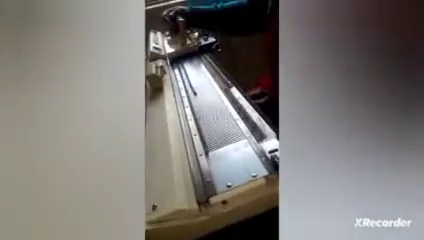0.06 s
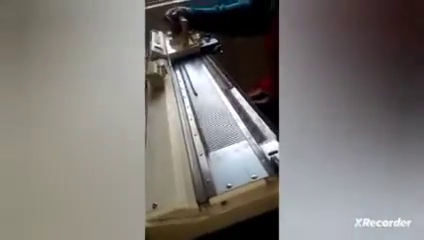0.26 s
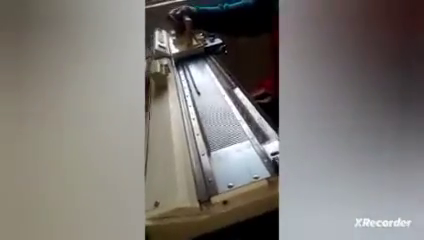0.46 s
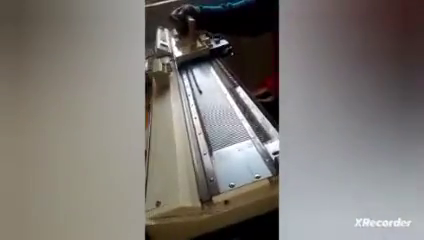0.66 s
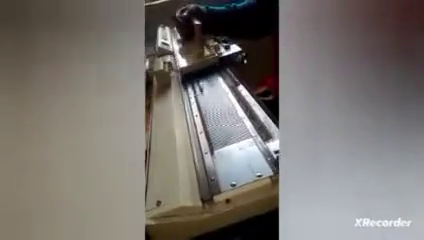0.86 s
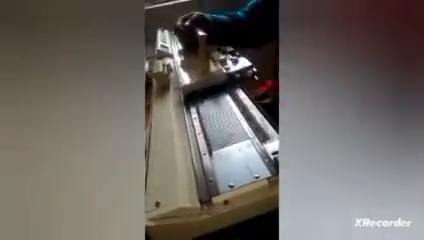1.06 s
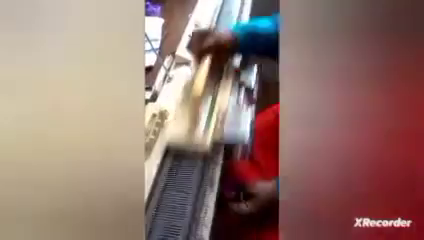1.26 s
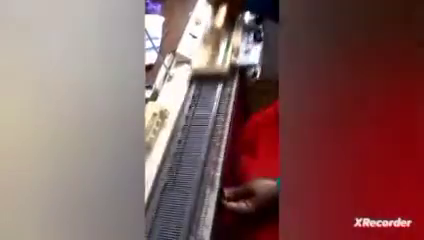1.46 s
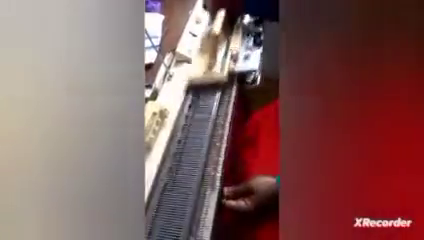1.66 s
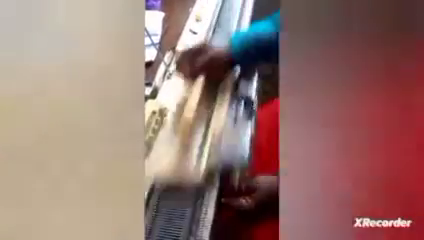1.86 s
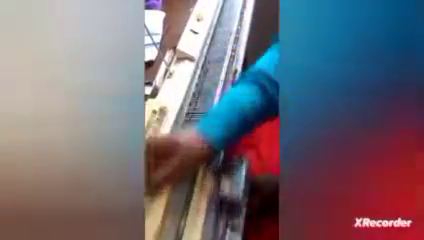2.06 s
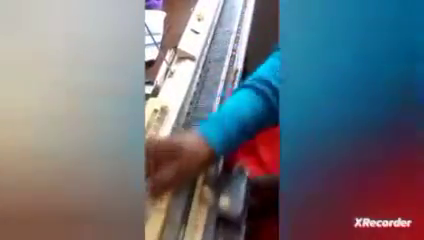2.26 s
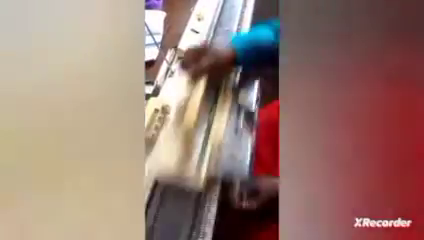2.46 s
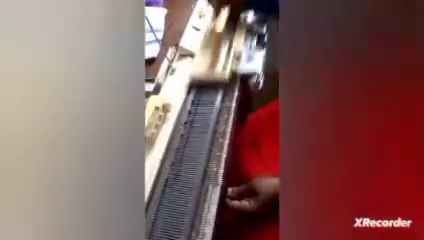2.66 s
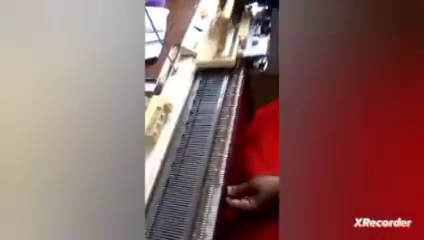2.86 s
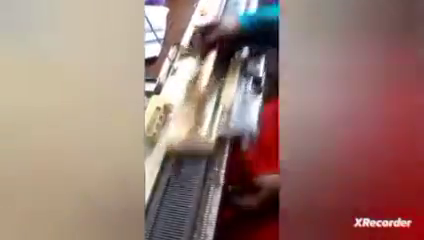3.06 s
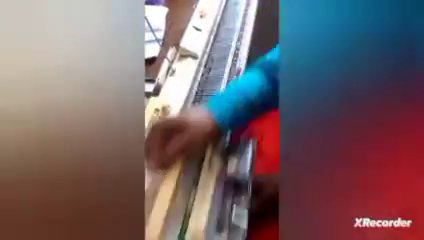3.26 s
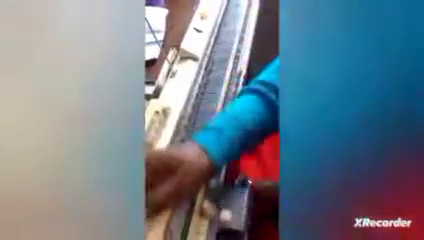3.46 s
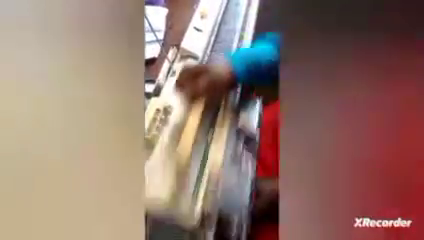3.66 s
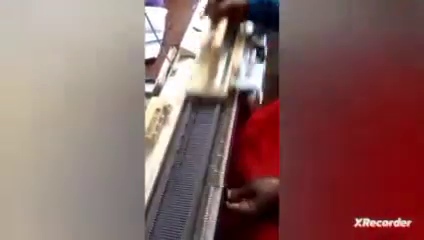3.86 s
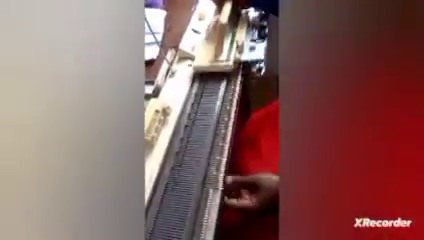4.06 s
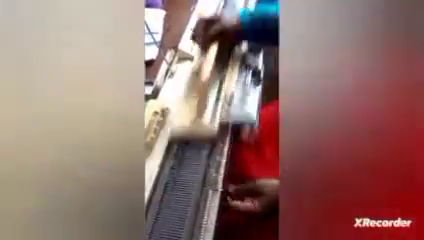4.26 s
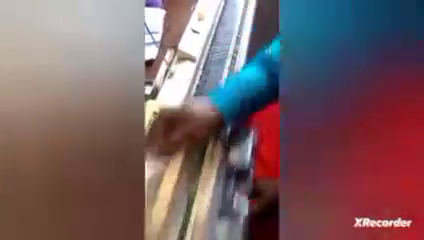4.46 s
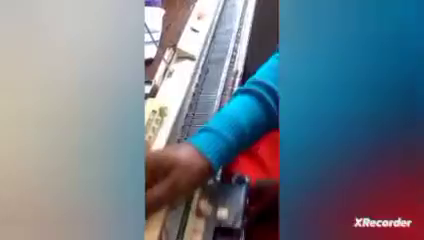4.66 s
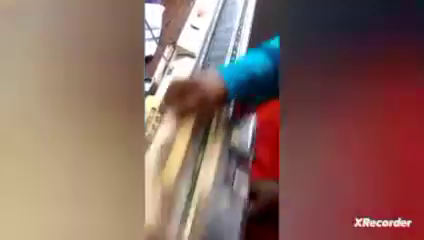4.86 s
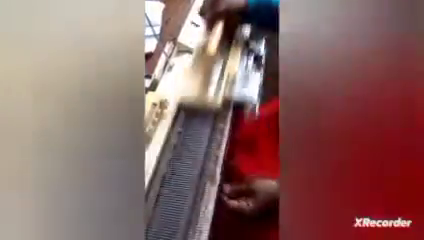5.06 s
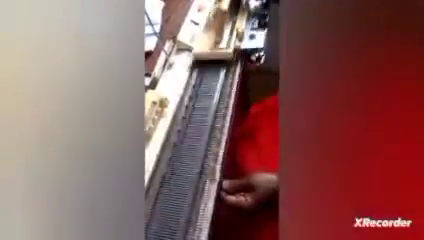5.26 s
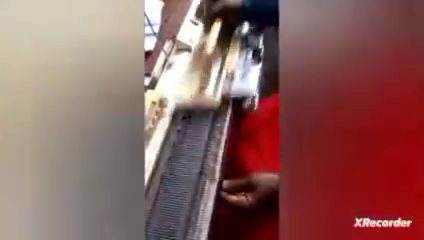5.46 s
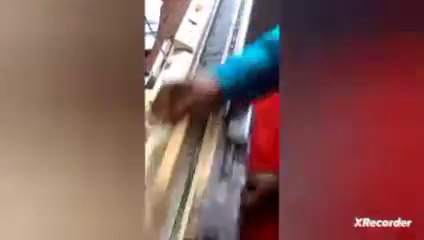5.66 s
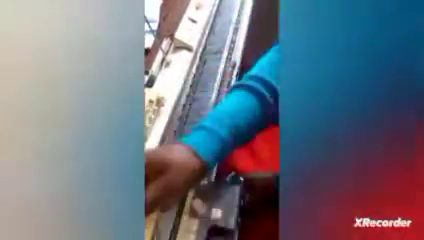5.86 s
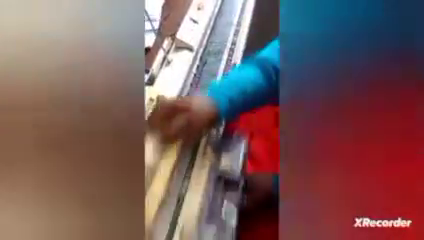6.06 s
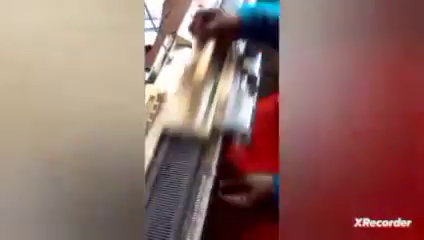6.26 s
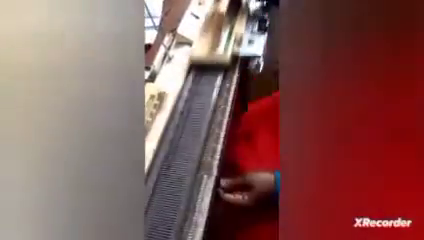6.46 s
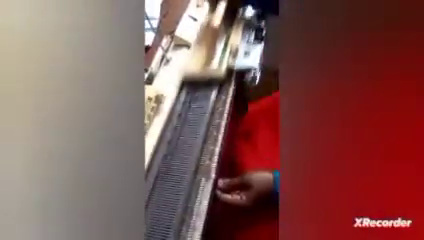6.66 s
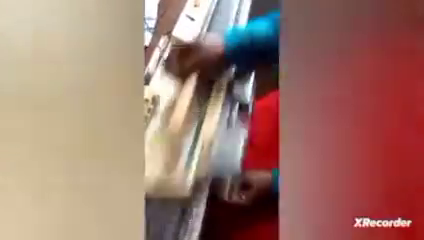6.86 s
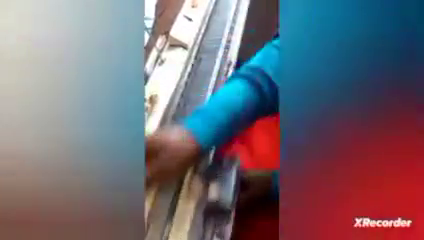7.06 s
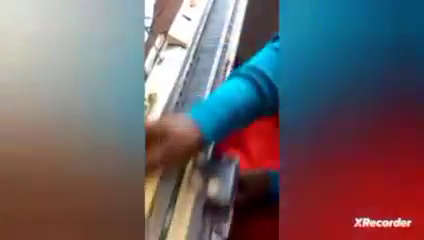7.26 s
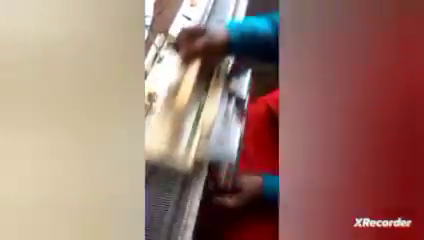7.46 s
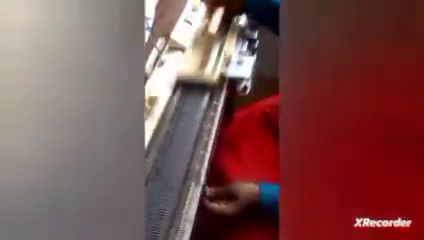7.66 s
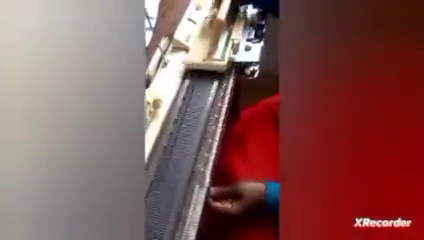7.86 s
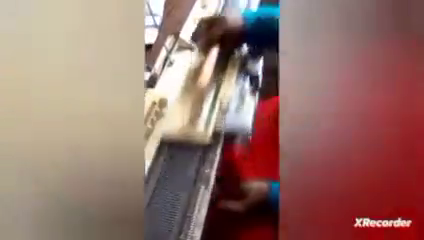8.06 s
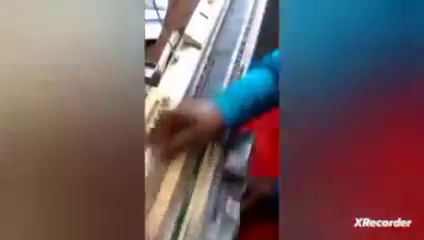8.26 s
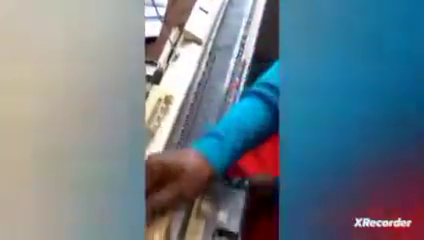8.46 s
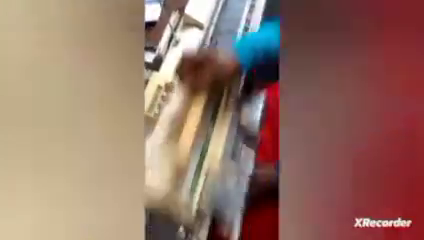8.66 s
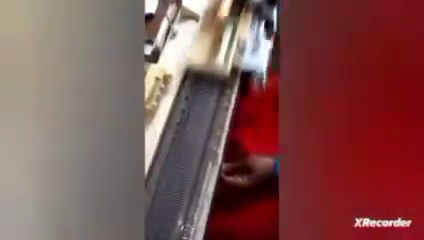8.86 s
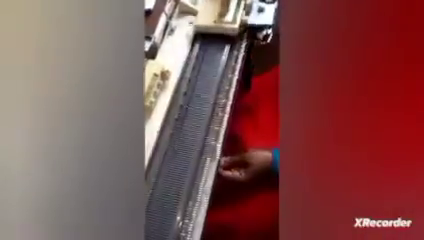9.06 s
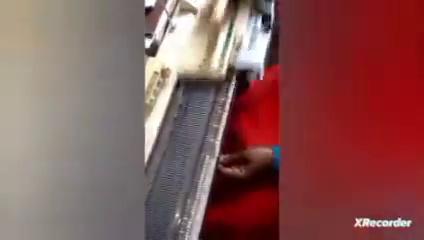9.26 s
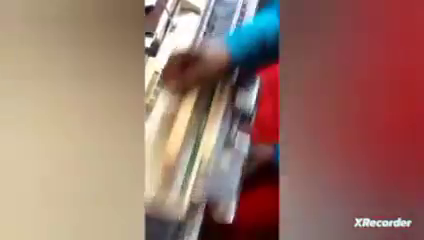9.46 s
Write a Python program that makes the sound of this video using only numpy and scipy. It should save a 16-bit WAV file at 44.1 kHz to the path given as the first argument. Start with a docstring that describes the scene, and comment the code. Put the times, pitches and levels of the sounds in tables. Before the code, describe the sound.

Harsh metallic zipping strokes alternate back and forth in brisk rhythm, with needle chatter, plate rattle, clacks at the turns and low table rumble.

```python
"""Hand knitting machine.

A carriage is pushed to and fro over a steel needle bed in a small room: one slow push, then quick passes.
Its cams strike hundreds of needles a second: bursts of blows through filters give rasp, plate rattle, fizz
and singing bed; resonant noise gives the table rumble. Every pass bites, speeds up and brakes.
A lever snaps over at the near end, light clacks mark the turns; faint thin wavering tones come before
the first push. Close and mono; the level dips briefly once."""
import sys
import numpy as np
from scipy import signal
from scipy.fft import rfft, irfft, next_fast_len
from scipy.io import wavfile
from scipy.ndimage import uniform_filter1d, minimum_filter1d, map_coordinates

SR = 44100
rng = np.random.default_rng(int(sys.argv[2]) if len(sys.argv) > 2 else 0)


def wav_record(signal):
    """Record a signal, one row per channel, as 16-bit PCM in the file named by sys.argv[1]."""
    frames = np.transpose(np.atleast_2d(signal))
    bounded = np.clip(frames, -1, 1)
    # unit amplitude maps onto the largest positive 16-bit level
    quanta = np.round(bounded * 32767).astype(np.int16)
    wavfile.write(sys.argv[1], SR, quanta)


N = 419391


def amp(db):
    """Decibels to gain."""
    return 10 ** (np.asarray(db) / 20)


def unit(x):
    """Scale to rms 1."""
    return x / np.sqrt(np.mean(x ** 2) + 1e-20)


def along(points, hz):
    """(Hz, value) points interpolated on a log frequency axis."""
    f, v = np.transpose(points)
    return np.interp(np.log(hz + 1), np.log(f + 1), v)


def curves(rows):
    """One value per sample for each column after the time."""
    s, *cols = np.transpose(rows)
    return [np.interp(np.arange(N) / SR, s, c) for c in cols]


def wobble(rate_hz):
    """Smooth random curve, rate_hz knots a second."""
    knots = rng.standard_normal(int(N * rate_hz / SR) + 4)
    return map_coordinates(knots, [np.arange(N) * rate_hz / SR])


def filtered(x, response):
    """x times a complex response of frequency."""
    size = next_fast_len(N + SR // 2)
    hz = np.fft.rfftfreq(size, 1 / SR)
    return irfft(rfft(x, size) * response(hz), size)[:N]


def coloured(x, spectrum, size=4096):
    """x through a causal minimum-phase filter with the given (Hz, dB) shape."""
    gain = amp(along(spectrum, np.fft.rfftfreq(size, 1 / SR)))
    cepstrum = irfft(np.log(np.maximum(gain, 1e-6)))
    # fold the cepstrum onto positive time
    cepstrum[1:size // 2] *= 2
    cepstrum[size // 2 + 1:] = 0
    impulse = irfft(np.exp(rfft(cepstrum)))
    return signal.fftconvolve(x, impulse)[:len(x)]


def voice(x, colour):
    """Coloured x at rms 1."""
    return unit(coloured(x, colour))


def resonant(x, modes):
    """x through parallel (Hz, width Hz, dB) resonances of alternating sign."""
    def response(f):
        total = 0
        for k, (centre, width, db) in enumerate(modes):
            loss = 1j * f * width
            total = total + (-1) ** k * amp(db) * loss / (centre * centre - f * f + loss)
        return total
    return filtered(x, response)


def fade(t, t60):
    """Exponential decay, 60 dB down after t60 seconds."""
    return np.exp(-np.log(1000) * t / t60)


def add(track, s, sound):
    """Mix a sound into the track at time s."""
    part = track[max(round(s * SR), 0):][:len(sound)]
    part += sound[:len(part)]


def peak_to(hit, db, size=132):
    """Scale a blow by its first 3 ms, whose crests stand about twice as high as its rms."""
    return amp(db) * hit / (2 * np.sqrt(np.mean(hit[:size] ** 2)))


# Quiet air spectrum: (frequency [Hz], relative level [dB])
AIR_COLOUR = [(18, -44), (30, -16), (150, 3), (247, -7), (328, -4), (859, -13), (3320, -17), (5440, -10),
              (6500, -22), (8250, -29), (15000, -26)]


def quiet_air():
    """Steady filtered noise of the still room."""
    return amp(-73.5) * voice(rng.standard_normal(N), AIR_COLOUR)


# Carriage taking up its play, mostly at the turns: (time [s], nominal level [dB])
CLACKS = [(0.034, -30), (0.883, -18), (1.499, -20), (1.67, -27.5), (1.733, -27.5), (2.273, -24),
          (2.297, -27), (2.916, -26.5), (2.971, -21), (3.519, -23), (4.766, -20.5), (4.792, -21),
          (5.44, -30), (6.044, -21), (6.696, -34), (7.267, -23.5), (7.959, -32), (8.584, -25.5)]
# Clack spectrum: (frequency [Hz], relative level [dB])
CLACK_COLOUR = [(150, -20), (350, -4), (1000, -1), (2200, -1.5), (3100, -13.5), (4900, 2.5), (6300, -13.5),
                (8000, -41), (15000, -58)]
# Carriage shell modes: (frequency [Hz], mean relative level [dB], t60 [s])
SHELL_MODES = [(145.7, -3.5, 0.64), (921, -6, 0.49), (1700, -4, 0.21), (2880, -3, 0.16), (4893, -13, 0.92),
               (5070, -5, 0.26), (5798, -16, 0.19)]
ENTRY_CLACK_DB = -26.5  # nominal, at the start of every pass but the first


def clacks(ring_db=-25):
    """The carriage rocks on its rail or meets the first needles, and the whole shell answers."""
    track, t = np.zeros(N), np.arange(SR // 2) / SR
    entries = [(row[0], ENTRY_CLACK_DB) for row in PASSES[1:]]
    for s, db in CLACKS + entries:
        decay = fade(t, .045) + .48 * fade(t, .33)
        hit = coloured(rng.choice([-1, 1], len(t)) * decay, CLACK_COLOUR)
        ring = np.zeros(len(t))
        for hz, level_db, t60 in SHELL_MODES:
            strength = amp(level_db + rng.normal(0, 3))
            ring += strength * np.sin(2 * np.pi * hz * t) * fade(t, t60)
        add(track, s, peak_to(hit, db - 3) + amp(db + ring_db) * ring)
    return track


# Faint thin wavering tones before the first push:
# (start [s], length [s], centre frequency [Hz], level before the common lift [dB])
FAINT_TONES = [(.27, .27, 5380, -81.5), (.33, .27, 4280, -84), (.38, .14, 1098, -82)]


def faint_tones(waver_hz=35, lift_db=7):
    """Each thin tone swells, wavers in pitch and level, and fades."""
    track, t = np.zeros(N), np.arange(N) / SR
    for s, length, hz, db in FAINT_TONES:
        swell = np.sin(np.pi * np.clip((t - s) / length, 0, 1))
        level = amp(db + lift_db + 2 * wobble(30))
        phase = 2 * np.pi * np.cumsum(hz + waver_hz * wobble(150)) / SR
        track += level * swell * np.sin(phase)
    return track


# Slow opening push: (time [s], nominal needle rasp level [dB], nominal rumble level [dB])
OPENING = [(0.66, -59, -78), (0.688, -49, -81), (0.83, -34, -50), (0.86, -34, -61), (0.946, -23, -39),
           (1.135, -24, -46)]
# Passes, in turn away from and towards the microphone: (start [s], speeding-up time [s], push time [s],
# nominal rasp level [dB], nominal rumble level [dB])
PASSES = [(1.15, 0.35, .28, -18, -36), (1.75, .15, 0.34, -14, -35.5), (2.371, .14, .312, -17, -38),
          (3.003, .125, 0.32, -14, -38), (3.601, .14, 0.32, -17.5, -39.5), (4.226, 0.15, .32, -13.6, -38),
          (4.831, .14, 0.32, -17.5, -40), (5.457, .15, .328, -13.5, -39), (6.096, .14, 0.33, -17.6, -40.5),
          (6.716, .175, .346, -14, -37), (7.35, .15, 0.32, -17.5, -40), (7.992, .18, .353, -14.5, -36.5),
          (8.623, .14, 0.31, -17.5, -39.5), (9.256, .17, .34, -15, -37)]
# Pass shape, away then towards: (rasp entry drop [dB], rasp sag [dB/s],
# rumble entry drop [dB], rumble build-up time [s])
DIRECTIONS = [(15.2, 2, 26.5, 0.36), (18.5, 17.5, 20, 0.11)]
BITE_S = .004
BRAKE_DB_PER_S, TURN_DB = 150, -49.5  # rasp fall after the push, light sliding at the turn
RUMBLE_LAG_S, RUMBLE_FALL_DB_PER_S = 0.052, 102  # the table shakes on a little longer


def strokes():
    """Rasp and rumble levels in dB: the slow push, then passes that bite, speed up, sag and brake."""
    t = np.arange(N) / SR
    rasp, roll = np.full(N, amp(TURN_DB)), np.full(N, 1e-5)
    for k, (start, attack_s, push_s, rasp_db, roll_db) in enumerate(PASSES):
        entry_db, sag, roll_entry_db, build_s = DIRECTIONS[k % 2]
        age = np.maximum(t - start, 0)
        bite = np.minimum(age / BITE_S, 1)  # cams meet the first needles abruptly
        speeding_up = entry_db * np.maximum(1 - age / attack_s, 0) ** 2
        braking = BRAKE_DB_PER_S * np.maximum(age - push_s, 0)
        rasp += bite * amp(rasp_db - speeding_up - sag * age - braking)
        building = roll_entry_db * np.maximum(1 - age / build_s, 0)
        settling = RUMBLE_FALL_DB_PER_S * np.maximum(age - push_s - RUMBLE_LAG_S, 0)
        roll += bite * amp(roll_db - building - settling)
    return np.where(t < DIP[1][0], curves(OPENING), 20 * np.log10([rasp, roll]))


def needle_blows(speed, full_hz, scatter_s, spread_db, count):
    """Each cam edge meets one needle after another; the blows scatter in time and size."""
    blows = np.zeros(N)
    rate_hz = full_hz * speed * amp(.25 * wobble(9))
    travel = np.cumsum(rate_hz) / SR  # in needles
    for cam in range(count):
        needles = np.arange(int(travel[-1]) - 1) + rng.random()
        at = np.interp(needles, travel, np.arange(N))
        late, size = rng.standard_normal((4096, 2))[:len(at)].T
        at = np.clip(at + late * scatter_s * SR, 0, N - 1).astype(int)
        strength = amp(spread_db * np.minimum(size, 2)) / np.sqrt(rate_hz[at])
        blows += np.bincount(at, strength, N)
    return unit(blows)


def chatter(blows, t60, share):
    """After each blow the loose part buzzes in its slot for a moment."""
    decay = fade(np.arange(SR // 10) / SR, t60)
    energy = signal.fftconvolve(blows ** 2, decay ** 2)[:N]
    buzz = unit(np.sqrt(np.abs(energy)) * rng.standard_normal(N))
    share = np.clip(share, 0, 1)
    return np.sqrt(1 - share) * blows + np.sqrt(share) * buzz


def shifting(x, patchy_db):
    """The needles that sound change as the carriage travels, so the resonances drift."""
    z = signal.stft(x, nperseg=1024)[2]
    field = rng.standard_normal(z.shape)
    for _ in range(2):
        field = uniform_filter1d(field, size=3, axis=0)
        field = uniform_filter1d(field, size=4, axis=1)
    return unit(signal.istft(z * amp(patchy_db * unit(field)), nperseg=1024)[1][:N])


# Needle spectra, hard, slow push and gentle: (frequency [Hz], relative level [dB])
NEEDLES_HARD = [(1650, -39), (2800, -12), (3420, -11.5), (4560, 0.5), (4860, 2), (6420, -8.5),
                (7290, -17.5), (7970, -30), (9000, -34.5), (11700, -78), (19800, -120)]
NEEDLES_SLOW = [(1650, -33), (2800, -10.5), (3350, -15.5), (3650, -7), (3940, -12), (4750, -0.5),
                (5710, -9), (6330, -11.5), (6810, -20), (7890, -32), (9000, -38), (11700, -43),
                (19800, -120)]
NEEDLES_GENTLE = [(1650, -55), (2800, -9), (3490, -3.5), (3610, 0.5), (4240, -3), (4650, 2), (5180, 2),
                  (5940, -9), (6580, -9), (7970, -47), (9000, -58), (11700, -88), (19800, -120)]
# Plate spectra, hard, slow push, hard after LATE_S, gentle: (frequency [Hz], relative level [dB])
PLATE_HARD = [(160, -35), (270, -13.5), (327, 0.5), (371, -6.5), (444, -5), (526, -7), (624, -2.5),
              (804, -3.5), (923, 1.5), (1140, 2), (1430, 3), (1650, -1.5), (2160, -1), (2350, -3),
              (3400, -12.5), (4420, -54), (7480, -120)]
PLATE_SLOW = [(160, -48), (270, -23), (313, -7), (363, -12), (449, -5), (555, -7), (617, -2), (747, -10.5),
              (1040, -3.5), (1170, 3.5), (1500, -6), (1620, -2), (1820, -9), (2200, -5), (3400, -23),
              (4420, -38), (7480, -120)]
PLATE_LATE = [(160, -47), (270, -15), (320, 0.5), (367, -8.5), (413, -3.5), (505, -13), (592, -3.5),
              (822, -4.5), (1050, 2), (1230, -7.5), (1440, -4.5), (1620, -6.5), (2160, 0), (2870, -16),
              (3400, -14), (4420, -15), (7480, -120)]
PLATE_GENTLE = [(160, -35), (270, -13), (313, 6.5), (417, -6.5), (484, -9), (1050, -0.5), (1500, -9.5),
                (1730, -9.5), (2110, -6), (2660, -15.5), (3400, -15), (4420, -36), (7480, -120)]
# Top-octave spectrum of hard blows: (frequency [Hz], relative level [dB])
FIZZ_COLOUR = [(6500, -14.5), (8200, -6), (10300, -4), (12000, -8.5), (15500, -14)]
# Steel bed modes: (frequency [Hz], width [Hz], relative level [dB])
BED_MODES = [(322, 23, 0.5), (416.7, 4.6, -2), (634, 89, -6), (1020, 110, -3), (1197, 11, -8),
             (3570, 80, 1)]
# Bed loss in the top octaves: (frequency [Hz], relative level [dB])
BED_DAMPING = [(4000, -5), (9000, -26)]
LATE_S = 7.95  # from here the plate rattles with another colour
FULL_DB = -17  # nominal rasp at full speed
# nominal rattle at full speed, its dB per dB of rasp, its change in the slow push
PLATE_DB, PLATE_FOLLOWS, SLOW_PLATE_DB = -22, 0.77, -5


def carriage(rasp_db):
    """The cams strike the needles: a faster carriage is louder, denser and brighter."""
    t = np.arange(N) / SR
    slow, late = t < DIP[1][0], t > LATE_S
    plate_db = PLATE_DB + PLATE_FOLLOWS * (rasp_db - FULL_DB) + SLOW_PLATE_DB * slow
    effort_db = np.minimum(rasp_db - FULL_DB, 0)
    speed = np.maximum(amp(.3 * effort_db), .25)
    blows = needle_blows(speed, full_hz=330, scatter_s=.0004, spread_db=3, count=8)
    # every few needles a latch flicks shut harder: a fine ratchet
    ticks = needle_blows(np.sqrt(speed), full_hz=112, scatter_s=.001, spread_db=2.5, count=1)
    # the ratchet stands out as the carriage brakes over the last needles
    braking = np.clip(-np.gradient(rasp_db) * SR / 60, 0, 1) * amp(.4 * effort_db)
    ratchet = .36 + .4 * braking
    needle_buzz = chatter(blows, t60=0.036, share=0.67)
    steel = unit(needle_buzz + ratchet * chatter(ticks, t60=0.0097, share=.85))
    shake = unit(chatter(blows, t60=0.04, share=.6) + .65 * ratchet * ticks)

    # gentle blows leave needles and plate dull
    hard = np.clip(1.57 + effort_db / 20, 0, 1)

    def blend(strong, gentle):
        return hard * strong + (1 - hard) * gentle

    needles = blend(voice(steel, NEEDLES_HARD), voice(steel, NEEDLES_GENTLE))
    needles = np.where(slow, voice(steel, NEEDLES_SLOW), needles)
    driven = np.where(late, voice(shake, PLATE_LATE), voice(shake, PLATE_HARD))
    plate = blend(driven, voice(shake, PLATE_GENTLE))
    plate = np.where(slow, voice(shake, PLATE_SLOW), plate)
    rasp = amp(rasp_db + 0.05 + 0.17 * wobble(35)) * shifting(needles, patchy_db=1.9)
    rattle = amp(plate_db + 0.71 * wobble(30)) * shifting(plate, patchy_db=1.97)
    # only hard blows reach the top octave
    hiss = coloured(chatter(blows, t60=0.022, share=0.62), FIZZ_COLOUR)
    fizz = amp(rasp_db - 29.5 + 0.34 * effort_db) * hard * shifting(hiss, patchy_db=2.1)
    # the bed keeps singing while the carriage slows down
    singing = voice(resonant(shake, BED_MODES), BED_DAMPING)
    bed = amp(plate_db - 15.0 - 0.22 * effort_db) * singing * ~slow
    return (rasp + rattle + fizz + bed) * (t > OPENING[0][0])


# Bed and table modes: (frequency [Hz], width [Hz], relative level [dB])
TABLE_MODES = [(85, 20, -4.5), (118.7, 6.7, 3.5), (158.6, 8.9, -0.5), (189, 22, -3.5), (219, 43, -4)]


def rumble(roll_db):
    """The sliding weight shakes the table under the bed: noise through its resonances."""
    shaking = unit(resonant(rng.standard_normal(N), TABLE_MODES))
    return amp(roll_db - 0.9 + 2.4 * wobble(25)) * shaking


# Lever snaps, mostly just into a pass away and near the end of a pass towards:
# (time [s], nominal level [dB], ring pitch [Hz])
SNAPS = [(0.8175, -18, 4970), (0.9384, -12, 4870), (2.159, -13, 5220), (2.416, -13, 5040),
         (3.364, -15, 5100), (3.4072, -12.5, 4800), (3.652, -19, 4900), (4.554, -18, 4800),
         (4.6486, -11.5, 4800), (4.887, -11, 4900), (5.8636, -12, 4640), (6.144, -12, 4900),
         (7.133, -13, 4910), (7.396, -18, 4894), (8.42, -12, 5030), (8.668, -22, 4910)]
# Snap spectrum: (frequency [Hz], relative level [dB])
SNAP_COLOUR = [(500, -10), (1400, -7), (2200, 6.5), (3200, -5.5), (5000, 11), (6400, 2.5), (7300, -16),
               (8200, -28), (15000, -56)]


def snaps():
    """A sprung lever flips: a very short crack with a steel ring."""
    track, t = np.zeros(N), np.arange(SR // 20) / SR
    for s, db, hz in SNAPS:
        crack = coloured(rng.choice([-1, 1], len(t)) * fade(t, .016), SNAP_COLOUR)
        ring = np.sin(2 * np.pi * hz * t) * (fade(t, 0.013) - fade(t, 0.0026))
        add(track, s, peak_to(crack / np.abs(crack).max() + .25 * ring, db + 1))
    return track


# Room decay: (frequency [Hz], t60 [s])
ROOM_DECAY = [(150, 0.72), (1000, 0.52), (5000, 0.13), (8000, 0.051), (14000, 0.23)]


def room(x, count=24):
    """A short diffuse noise tail, redrawn for each of count equal spans as the carriage moves."""
    wet = np.zeros(N)
    for part in np.array_split(np.arange(N), count):
        hz, age, z = signal.stft(rng.standard_normal(SR // 2), SR, nperseg=256)
        decay = fade(age, along(ROOM_DECAY, hz)[:, None])
        tail = signal.istft(z * decay, SR, nperseg=256)[1]
        add(wet, part[0] / SR, signal.fftconvolve(x[part], tail / np.linalg.norm(tail)))
    return wet


def scene():
    """Machine, room, quiet air and faint tones, alike in both channels."""
    rasp_db, roll_db = strokes()
    machine = carriage(rasp_db) + rumble(roll_db) + snaps() + clacks()
    mono = machine + amp(-13.5) * room(machine) + quiet_air() + faint_tones()
    return np.array([mono, mono])


# Brief level dip; its second time also ends the slow push: (time [s], level [dB])
DIP = [(1.137, 0.5), (1.143, -45), (1.152, -23), (1.162, -14.5), (1.21, 0)]
TOP_HZ = 15750


def record(dry):
    """A fast limiter holds the peaks, the level dips briefly once, and a band limit cuts the top."""
    dip_db, = curves(DIP)
    needed = np.minimum(1, .6 / (np.abs(dry).max(axis=0) + 1e-9))
    gain = uniform_filter1d(minimum_filter1d(needed, size=89), size=89)  # 2 ms windows
    return np.array([filtered(side * gain * amp(dip_db), lambda hz: hz < TOP_HZ) for side in dry])


dry = scene()
out = record(dry)
wav_record(out)
```